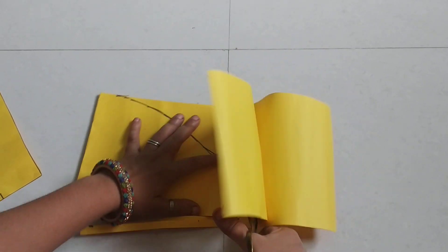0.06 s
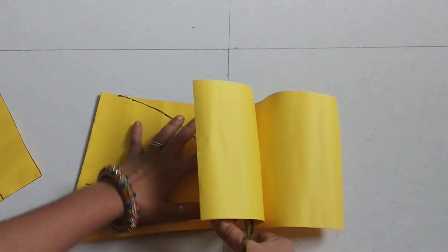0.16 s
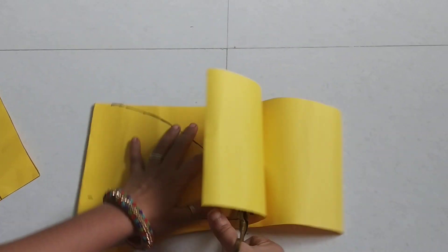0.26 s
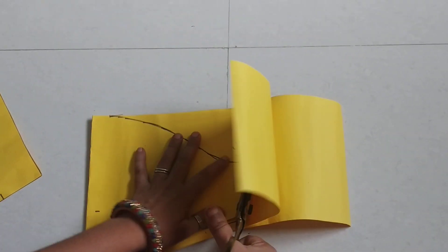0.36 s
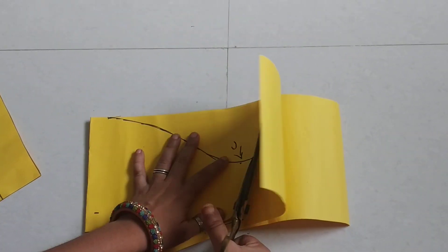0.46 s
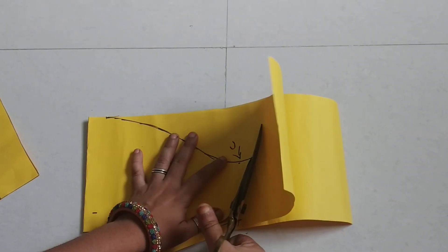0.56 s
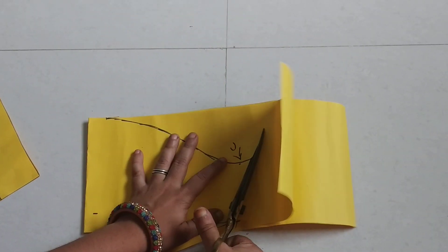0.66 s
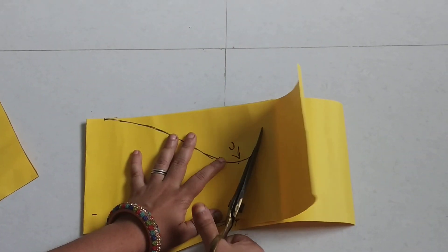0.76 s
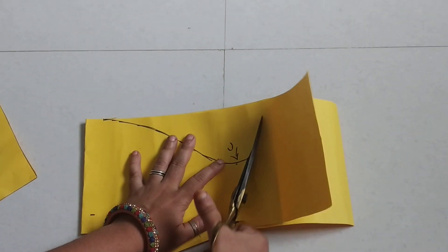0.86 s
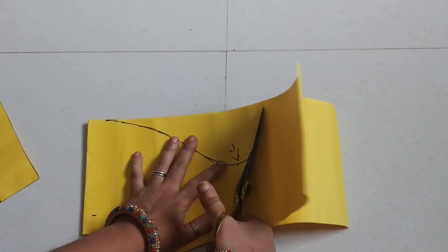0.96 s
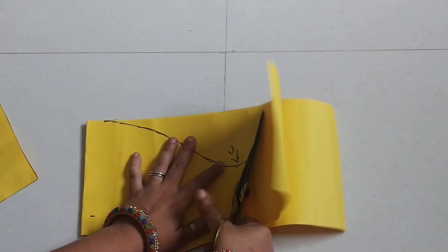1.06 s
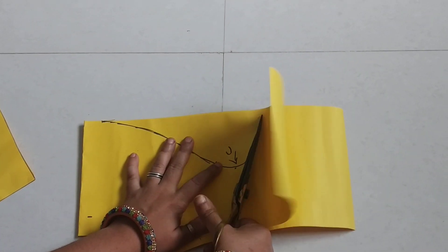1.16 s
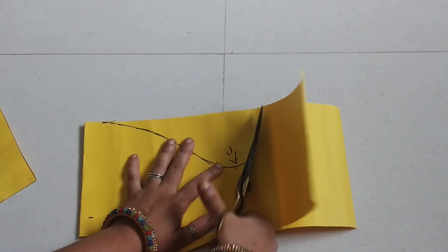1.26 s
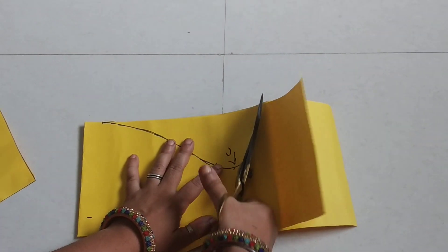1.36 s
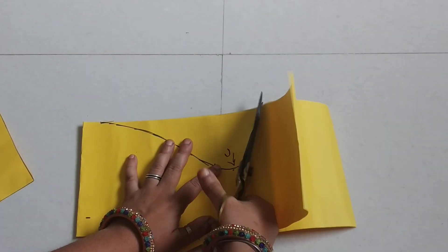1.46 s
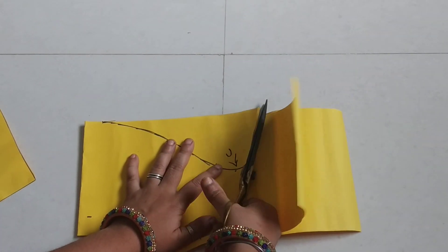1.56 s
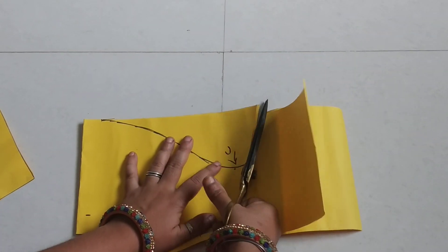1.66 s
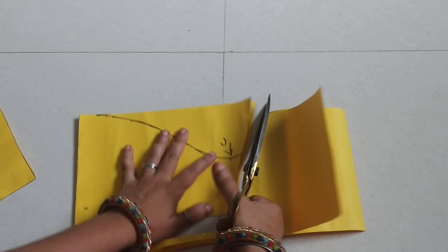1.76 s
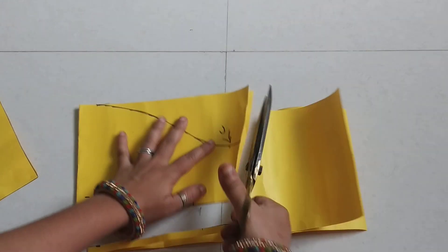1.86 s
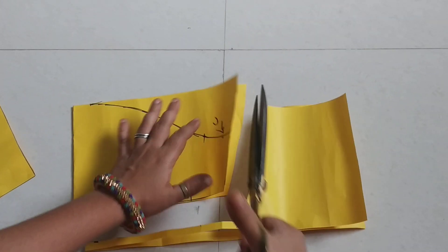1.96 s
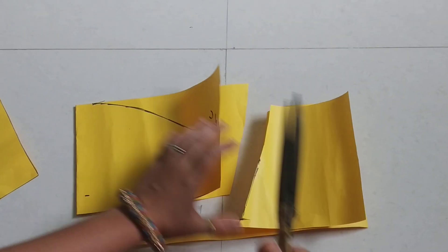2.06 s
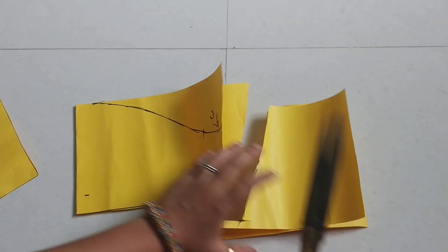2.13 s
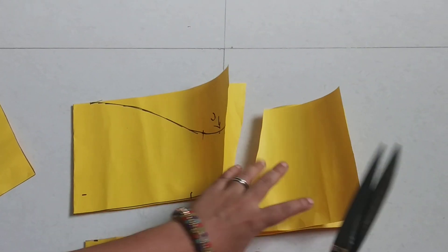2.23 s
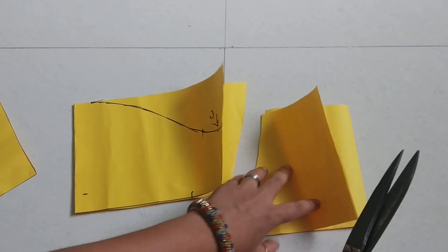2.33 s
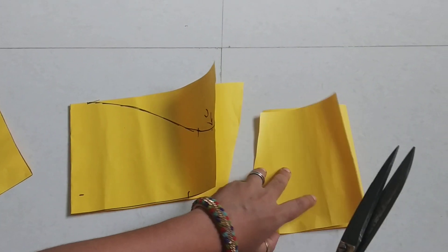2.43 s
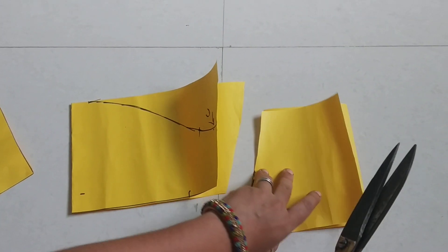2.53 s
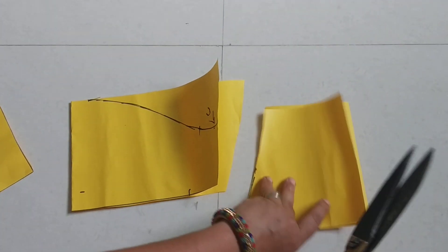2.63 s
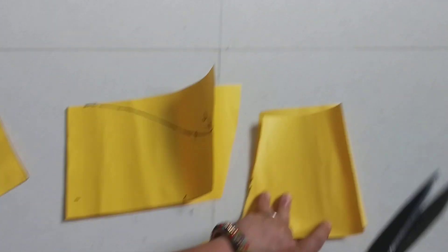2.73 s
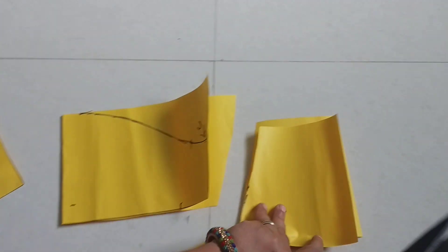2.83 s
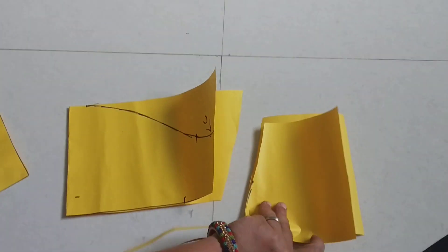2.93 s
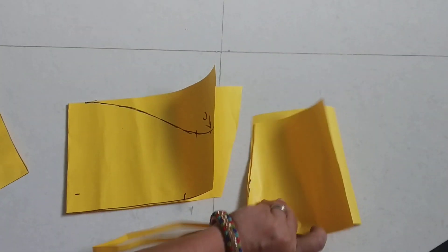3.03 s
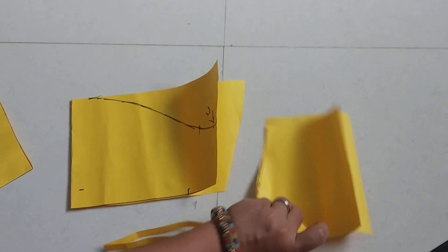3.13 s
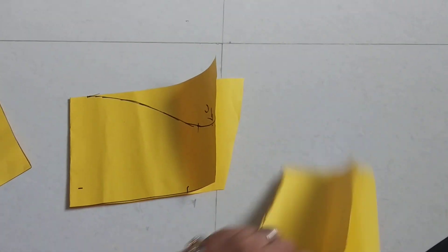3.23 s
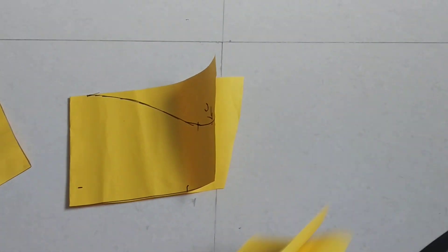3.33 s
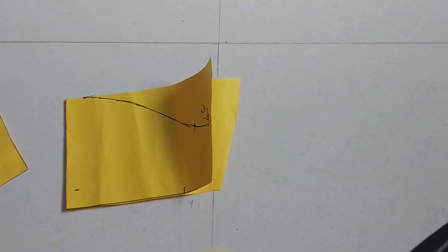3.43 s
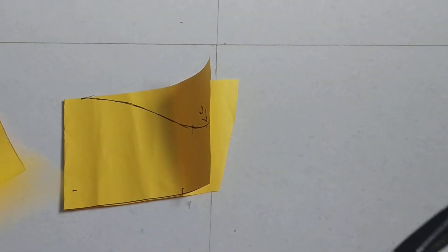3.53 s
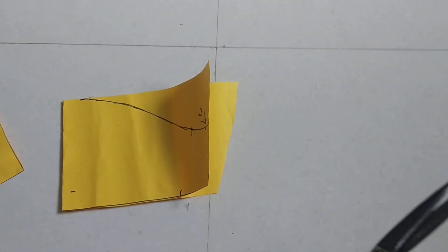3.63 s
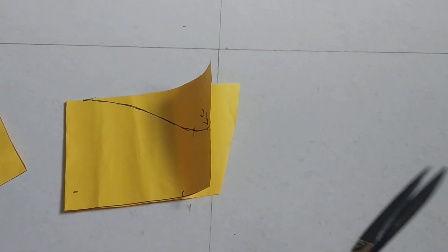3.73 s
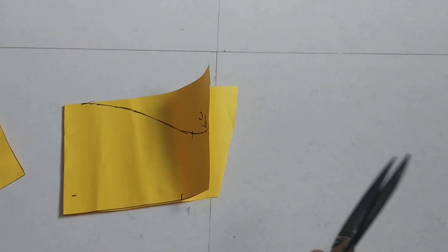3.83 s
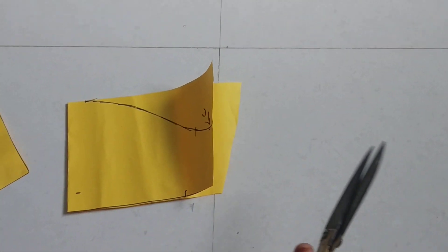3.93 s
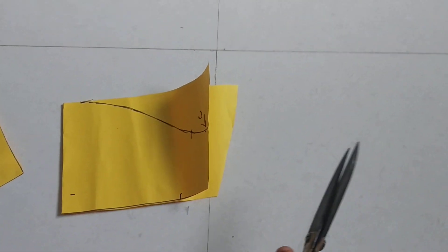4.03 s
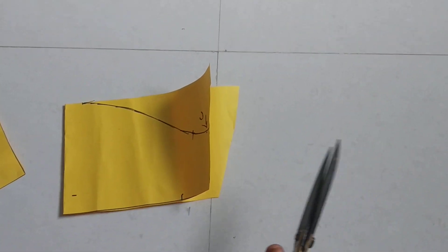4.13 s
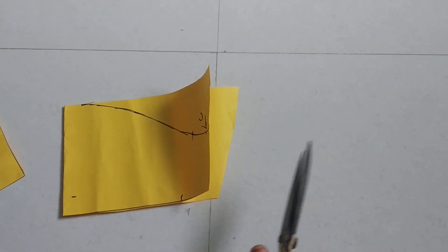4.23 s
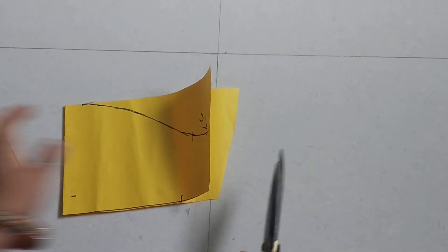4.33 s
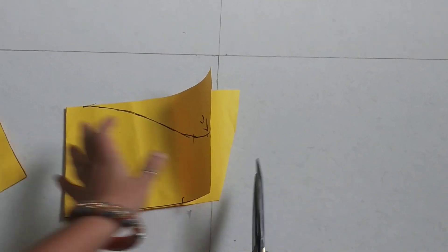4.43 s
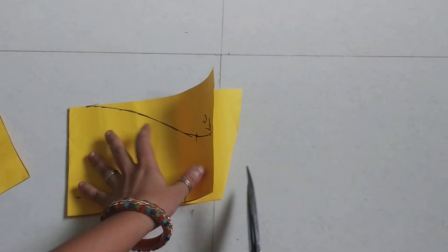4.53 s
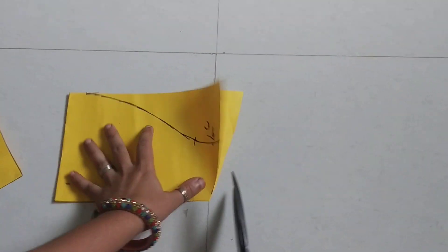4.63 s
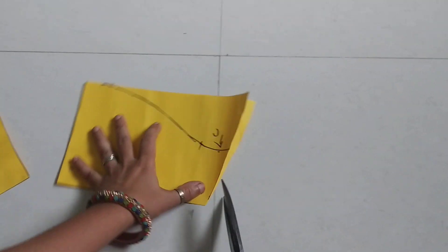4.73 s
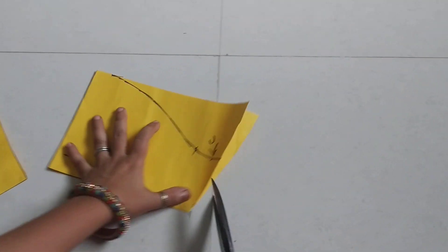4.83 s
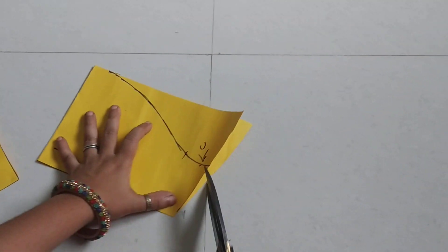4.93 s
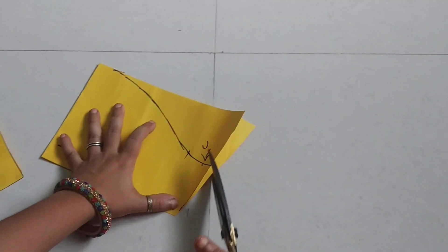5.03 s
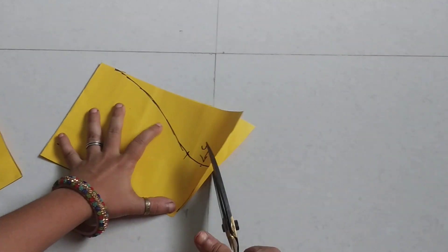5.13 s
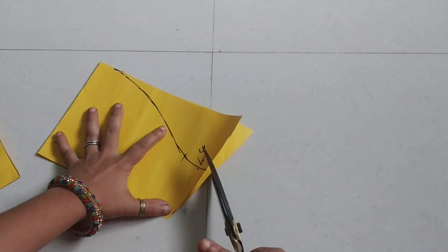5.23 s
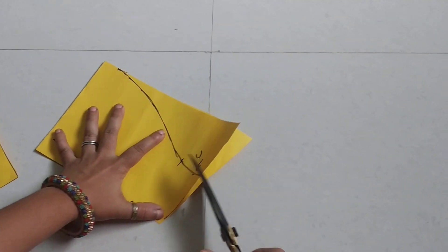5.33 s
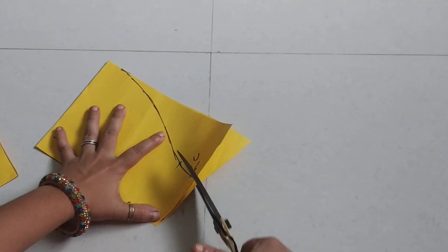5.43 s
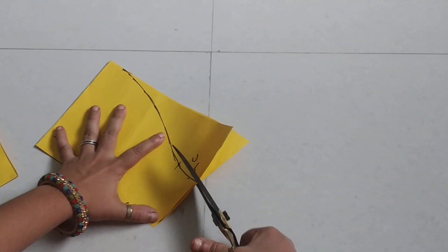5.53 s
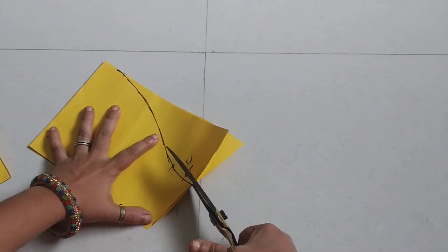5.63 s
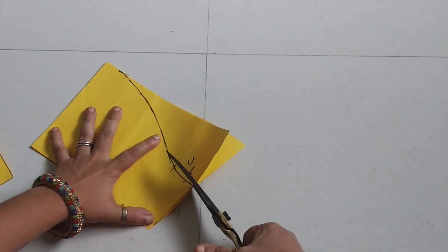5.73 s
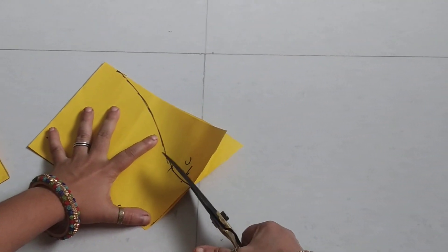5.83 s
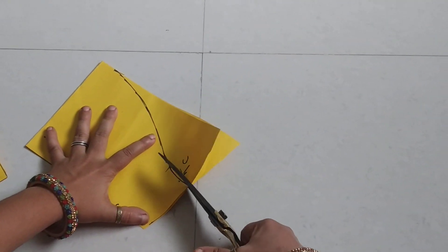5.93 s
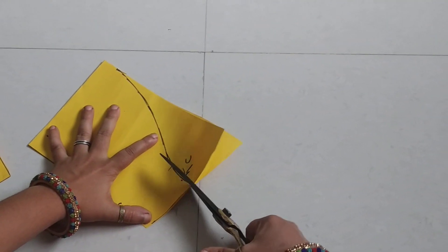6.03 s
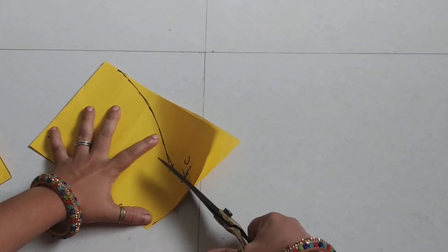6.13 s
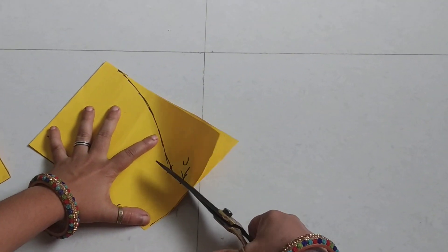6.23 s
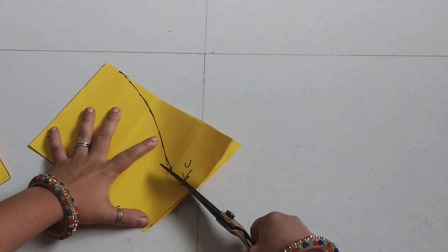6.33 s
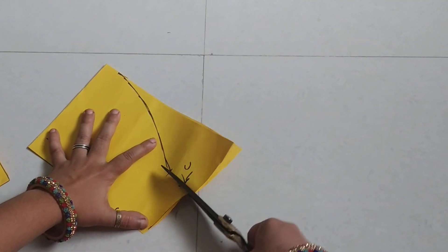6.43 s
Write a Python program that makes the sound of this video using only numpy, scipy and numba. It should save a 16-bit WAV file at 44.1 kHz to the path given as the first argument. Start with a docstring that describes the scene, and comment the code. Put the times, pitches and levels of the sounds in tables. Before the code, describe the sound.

Four sharp, tearing snips come in under two seconds, evenly spaced, each with papery snaps and a short bright room echo. A steel clack follows, then faint rustling and dull low rumble. Blades clack shut with a dull knock; dry, woody creaks of a gripped recorder run under a bangle's brief rattle. Paper scrapes hollowly on the floor before one soft final snip.

```python
"""Heavy steel scissors snip four times through folded paper on the tiled floor of a bare, echoing room.
The blades clack open, the offcut is pulled away, and the blades clack shut while the recorder creaks in the hand.
A bangle knocks and buzzes on the floor, the sheet drags over the tiles as it is turned, and a new cut begins.
Paper and sliding steel are made from random grains, hits from short noise bursts and decaying tones.
Low rumbles, steady room noise and a wavering hum lie underneath."""
import sys
import numpy as np
from scipy import signal
from scipy.fft import rfft, irfft
from scipy.io import wavfile
from numba import njit

SR = 44100
rng = np.random.default_rng(int(sys.argv[2]) if len(sys.argv) > 2 else 0)


def digitize_waveform(pressure):
    """Quantize a signal to 16-bit integers and store it at the path in sys.argv[1].

    Rows of a 2-D input are taken as channels; values are limited to [-1, 1].
    """
    field = np.atleast_2d(pressure).T
    bounded = np.clip(field, -1, 1)
    quanta = np.round(bounded * 32767).astype(np.int16)
    wavfile.write(sys.argv[1], SR, quanta)


N = 285768
TIME = np.arange(N) / SR   # seconds
CUTOFF_HZ = 16000          # nearly nothing is left above this pitch
CUT_EASE_DB = 6.5          # the bite is hardest at first and eases by this much towards the tips

# the blades bite and shear the paper, then reopen; levels are relative:
# (start_s, length_s, level_db, treble_db, ring_hz, reopening_level_db)
CUT_STROKES = [(0.127, 0.037, -29.5, 3, 2500, -77), (0.499, 0.057, -33.5, 6.5, 3180, -43),
               (0.9256, 0.0588, -26.5, 3, 3170, -42), (1.347, 0.08, -30, 6, 2420, -49.5),
               (6.421, 0.13, -45, 8, 2760, -48)]
# tone colour of cutting, snaps and knocks: (pitch_hz, relative_level_db per Hz)
SHEAR_COLOUR = [(100, -17.5), (300, -8.5), (700, -3), (1100, 1.5), (1600, 4.5), (3100, 1.5), (4500, -2.5),
                (5700, -4.5), (7200, -6.5), (10000, -8), (15500, -17.5)]


def cutting(clump_db=2.0, tear_db=-2.0):
    """The closing blades tear through fibres in uneven clumps, each bundle giving way with a tiny snap."""
    gain, treble_db = strokes(CUT_STROKES, rise_s=0.0084, fall_s=0.01, ease_db=CUT_EASE_DB)
    clumps = grains(per_s=5000, spread_db=2.4) * from_db(clump_db * drift(400))
    fibres = flexing(clumps, patchy_db=5.0, rate=220)
    torn = sheet_ring(brighten(gain * fibres, treble_db), CUT_STROKES, sag_octaves_per_s=7.6,
                      wander_octaves=0.17, q=6.6, ring_db=-5.0)
    return through(from_db(tear_db) * torn + splinters(), colour(SHEAR_COLOUR))


def splinters(per_s=210, size_db=11, spread_db=2.5, pitch_octaves=0.53, decay_s=0.001, count=48):
    """Thicker fibre bundles break one by one along each cut, each a short ping near the sheet's pitch."""
    rows = []
    for s, length, db, treble_db, ring_hz, reopening_db in CUT_STROKES:
        waits = rng.uniform(.2, 1.8, count)   # uneven gaps, 1 on average
        sizes, pitches = np.clip(rng.standard_normal((2, count)), -2, 2)
        for age, size, pitch in zip(np.cumsum(waits) / per_s, sizes, pitches):
            if age < length and s + age < TIME[-1]:
                level_db = db + size_db + spread_db * size - CUT_EASE_DB * age / length
                ping_hz = min(ring_hz * 2 ** (pitch_octaves * pitch), CUTOFF_HZ)
                rows.append((s + age, level_db, treble_db, ping_hz, decay_s))
    return cracks(rows, ring_db=8.0, ring_q=7.6)


def snaps_and_knocks(apart_db=-11):
    """Each snap or knock cracks and rings; it reaches the two ears slightly differently."""
    # the folded sheet snaps and buckles, and the closing blades knock dully near 3.97 s:
    # (start_s, relative_strength_db, treble_db, ring_hz, decay_s)
    hits = [(.1355, -12.5, -19, 2720, 0.00035), (.1455, -11.5, -21, 1050, 0.0024),
            (.1472, -5, -9, 2420, 0.00036), (.156, -22, -3, 900, 0.00091), (.455, -20, -20, 1360, 0.014),
            (.4995, -14.5, -2, 3320, 0.00078), (.503, -9, -7, 3250, 0.0056),
            (.5075, -11.5, 3.5, 3340, 0.0021), (.512, -13, 0, 3800, 0.001), (.565, -19, 5, 1230, 0.0031),
            (.843, -24.5, -14, 1290, 0.0056), (.9415, -17, -2, 3020, 0.00071),
            (.9958, -11.5, -1, 2570, 0.0053), (.9962, -11, -12, 1250, 0.0014),
            (1.3275, -14, -8, 1400, 0.0018), (1.335, -24, 11, 1600, 0.0012),
            (1.3565, -23, -12, 1500, 0.0028), (1.3675, -14, -10, 1700, 0.0045),
            (1.3965, -11, -2, 3800, 0.0035), (1.4045, -21.5, 15.5, 1621, 0.0025),
            (1.4125, -20, -10, 1600, 0.0018), (1.632, -28.5, 3, 1900, 0.013), (1.971, -35, 2, 2530, 0.0053),
            (1.991, -37, 11, 2780, 0.005), (2.158, -28.5, -13, 2190, 0.0025),
            (2.189, -27.5, 7, 2700, 0.0047), (2.928, -29.5, -4, 1740, .003),
            (2.9975, -27.5, 2, 1970, 0.0055), (3.054, -29.5, -24, 1380, 0.0021),
            (3.066, -28.5, -22, 1350, 0.0016), (3.106, -38.5, 12, 4900, 0.0034),
            (3.538, -28.5, 1, 900, 0.0016), (3.5635, -32.5, 2, 1680, .003), (3.926, -28, 1, 1930, 0.0013),
            (3.971, -19, -14, 1410, 0.0075), (3.98, -15, -12, 1220, 0.0046), (4.8345, -29, -4, 2880, .002),
            (4.848, -32, 12.5, 5970, 0.0058), (5.316, -28, -7, 2440, 0.0026),
            (5.325, -22.5, -4, 2360, 0.0021)]
    mid, side = (cracks(hits) for _ in range(2))
    stereo = mid + from_db(apart_db) * side * [[1], [-1]]
    return from_db(3.5) * through(stereo, colour(SHEAR_COLOUR))


def gliding(judder_db=1.0):
    """Steel edges rub with a fine, uneven grain as the blades swing in the air."""
    # blades sliding on each other: (start_s, length_s, level_db, treble_db)
    glides = [(2.42, 0.063, -75, 22), (3.81, 0.14, -55, 2), (3.93, .022, -41, -18),
              (3.953, 0.074, -33.5, -5), (4.25, 0.3, -56.5, 2.5), (4.95, 0.18, -64.5, 4),
              (5.16, 0.29, -56.5, 0.5), (6.37, 0.068, -54.5, 2.5)]
    # tone colour of the rub: (pitch_hz, relative_level_db per Hz)
    rub_colour = [(200, -10.5), (700, -3), (1400, 1.5), (2000, 2.5), (2900, 2.5), (4000, -0.5), (5700, -3),
                  (7100, -0.5), (8500, -1.5), (11000, -2.5), (15500, -12)]
    # the hand pauses after a cut, then swings the blades apart
    pause_s, reopen_s, reopen_treble_db = 0.12, 0.17, -3.5
    reopenings = [(s + length + pause_s, reopen_s, db, reopen_treble_db)
                  for s, length, *bite, db in CUT_STROKES]
    gain, treble_db = strokes(glides + reopenings, rise_s=0.01, fall_s=0.015, ease_db=1.0)
    juddering = grains(per_s=9000, spread_db=1.0) * from_db(judder_db * drift(80))
    rub = flexing(juddering, patchy_db=3.0, rate=110)
    return through(brighten(gain * rub, treble_db), colour(rub_colour))


def clacking(chatter_s=0.0013):
    """Steel chatters on steel; the hand damps the ring at once, and each mode radiates its own way."""
    # the blades hit their stop: (start_s, relative_level_db, treble_db, left_minus_right_db, left_ear_lag_s)
    clacks = [(2.4922, -31, 8, -3, 0), (2.4934, -4, 4.5, -4, 0.0011), (3.9542, -12, -5, -4, .00045),
              (3.957, -1.5, -6.5, -6, 0.0024), (6.421, -27, 4.5, -1, 0.011), (6.4565, -19.5, 2.5, -6, 0.01)]
    # ringing tones of the blades: (pitch_hz, width_hz, relative_level_db, left_minus_right_db)
    steel_modes = [(1820, 640, -3, 3.5), (2700, 840, -1.5, 1.5), (4280, 660, -0.5, -3), (6560, 760, 3, 2),
                   (9150, 2500, -2.5, 2.5), (11100, 1600, -1.5, 1), (13700, 3000, -6, 10.5)]
    clicks = cracks([(s, db, treble_db, None, chatter_s) for s, db, treble_db, *place in clacks])
    ears = []
    for side in (.5, -.5):   # left, then right
        heard = clicks * from_db(side * held(clacks, axis=3))
        modes = [(hz, width, db + side * pan) for hz, width, db, pan in steel_modes]
        ears.append(through(heard, body(modes))[0])
    left, right = ears
    return np.array([np.interp(TIME - held(clacks, axis=4), TIME, left), right])


def rustling(clump_db=2.0):
    """Moving paper crackles in clumps; pressed flat, it drags with a smooth, hollow scrape."""
    # paper lifted, pulled and turned: (start_s, length_s, relative_level_db, treble_db, ring_hz, rise_s)
    rustles = [(0, 0.11, -54, 6.5, 2240, 0.00063), (0.298, 0.28, -52.5, -29, 1800, .01),
               (0.444, 0.034, -46, -5.5, 1480, .004), (1.324, 0.032, -40, 6, 1600, 0.0029),
               (1.974, 0.16, -61, 6.5, 2700, 0.0026), (2.143, 0.063, -54.5, 6.5, 2700, 0.0067),
               (2.643, 0.17, -55, 6.5, 2580, 0.018), (2.862, 0.2, -54, 8, 2500, 0.051),
               (3.035, 0.092, -54.5, 2, 1240, 0.021), (3.21, 0.23, -63.5, 0, 2840, 0.044),
               (3.539, 0.052, -52, 6.5, 1210, .008), (4.829, 0.078, -48, 5.5, 2760, 0.005),
               (5.306, 0.033, -50.5, 10, 2600, 0.0056), (6.144, 0.023, -50.5, 5, 2200, 0.003),
               (6.174, 0.037, -51, 5.5, 1380, 0.0067), (6.216, 0.061, -49, 2.5, 2400, 0.005)]
    # the sheet drags over the tiles: (time_s, relative_level_db)
    drag_levels = [(5.38, -47.5), (5.5, -56), (5.62, -46), (5.72, -53), (5.88, -63), (6.05, -58.5)]
    # tone colours of loose paper and of the drag: (pitch_hz, relative_level_db per Hz)
    paper_colour = [(150, -1.5), (400, 9), (850, 6), (1500, 4), (2000, 1.5), (2600, 5), (4000, 0.5),
                    (6000, -2.5), (9500, -3.5), (15500, -9)]
    scrape_colour = [(350, -0.5), (700, -8), (1400, -13), (1850, 7), (2080, -1), (2440, 7.5), (2750, -6),
                     (4300, -15), (15000, -36)]
    # each move of the sheet slackens by 6 dB
    gain = sum(from_db(db) * envelope(s, length, rise_s, fall_s=0.043, ease_db=6)
               for s, length, db, treble_db, ring_hz, rise_s in rustles)
    clumps = grains(per_s=2600, spread_db=1.0) * from_db(clump_db * drift(120))
    crackle = flexing(clumps, patchy_db=4.5, rate=110)
    rustle = sheet_ring(brighten(gain * crackle, held(rustles, axis=3)), rustles, sag_octaves_per_s=3.4,
                        wander_octaves=0.2, q=1.66, ring_db=-0.5)
    s, level_db = np.transpose(drag_levels)
    drag_gain = np.interp(TIME, s, from_db(level_db), left=0, right=0)
    drag = drag_gain * grains(per_s=7500, spread_db=1.5)
    return (from_db(-1.0) * through(rustle, colour(paper_colour))
            + from_db(-8.0) * through(drag, colour(scrape_colour)))


def bangle():
    """The bangle knocks on the floor as the hand lands, then buzzes on while the hand turns the sheet."""
    # knocks through the paper: (start_s, relative_peak_db)
    knocks = [(4.6412, -25), (4.6445, -29)]
    # ringing tones of the bangle: (pitch_hz, width_hz, relative_level_db)
    bangle_modes = [(690, 600, -3.5), (1190, 94, 3.5), (1510, 190, -2), (2240, 100, 3.5), (2580, 160, 1.5),
                    (7540, 5700, -17)]
    rattle = slips(knocks[-1][0], length=.18, per_s=130, db=-37, ease_db=11)   # on the whole ever softer
    return contacts(knocks + rattle, bangle_modes, detune=0.038, vary_db=3.0)


def grip(groan_hz=368, groan_wander=1.0):
    """Sticking and slipping on the recorder's case reach the microphones directly, without echo."""
    # the grip slips on the case: (start_s, peak_db)
    creak_hits = [(3.865, -36.5), (4.106, -37), (4.168, -36), (4.263, -36.5), (4.321, -37), (4.424, -36),
                  (4.521, -35.5), (4.643, -34), (4.68, -33), (4.724, -33), (4.767, -34.5), (4.819, -35),
                  (4.905, -34.5)]
    # a finger drags on the case and keeps its lowest tone groaning: (start_s, length_s, level_db)
    groans = [(3.753, 0.027, -37.5), (3.796, 0.05, -39.5)]
    # ringing tones of the case: (pitch_hz, width_hz, relative_level_db)
    case_modes = [(344, 41, 7), (646, 88, -3), (1050, 410, -22), (2420, 190, -12)]
    creaks = contacts(creak_hits, case_modes, detune=0.027, vary_db=3.0)
    # around the creaks the grip creeps on in tiny slips, slightly stronger with time
    creep_hits = slips(3.85, length=1.2, per_s=38, db=-48, ease_db=-1)
    creeping = contacts(creep_hits, case_modes, detune=0.093, vary_db=1.0)
    pressure = sum(from_db(db) * envelope(s, length, rise_s=0.0083, fall_s=0.0083, ease_db=7.0)
                   for s, length, db in groans)
    tone = np.sin(2 * np.pi * groan_hz * TIME + groan_wander * drift(83))
    return creaks + creeping + pressure * from_db(3.3 * drift(150)) * tone


def rumbling(width_octaves=0.58, sink_octaves_per_s=2.5):
    """Dull, low noise whose centre slides down through a row of bands."""
    # rumbles that sink in pitch: (start_s, length_s, first_centre_hz, level_db)
    rumbles = [(0, 0.087, 900, -47), (0.134, 0.056, 770, -32), (0.145, 0.28, 228, -49),
               (0.948, 0.13, 480, -47.5), (1.41, 0.21, 343.3, -42.5), (2.16, 0.042, 199, -53),
               (2.534, 0.58, 180, -47.5), (2.878, 0.09, 67.6, -51), (3.965, 0.042, 577, -38),
               (6.215, 0.08, 430, -50)]
    gains = [from_db(db) * envelope(s, length, rise_s=0.014, fall_s=0.06, ease_db=13)
             for s, length, hz, db in rumbles]
    centres = [np.log2(hz) - sink_octaves_per_s * (TIME - s) for s, length, hz, db in rumbles]
    out = 0
    for band_hz in 45 * 2 ** np.arange(0, 5, .5):   # half an octave apart
        edges_hz = [band_hz / 2 ** .25, band_hz * 2 ** .25]
        sos = signal.butter(2, edges_hz, "band", fs=SR, output="sos")
        share = 0
        for gain, centre in zip(gains, centres):
            distance = (np.log2(band_hz) - centre) / width_octaves
            share = share + gain * np.exp(-.5 * np.minimum(distance ** 2, 20))
        out = out + share * rms_one(signal.sosfilt(sos, rng.standard_normal(N)))
    return out / np.sqrt(2 * np.sqrt(np.pi) * width_octaves)   # keeps the bands' summed power level


def background(air_db=-54, waver_db=4.0, wander=1.8):
    """Steady room noise lies under low hum tones that waver in strength and phase."""
    # tone colour of the room noise: (pitch_hz, relative_level_db per Hz)
    air_colour = [(12, -11), (22, 2), (45, -5), (80, -7.5), (150, -11), (350, -8.5), (600, -15.5),
                  (1100, -22.5), (3000, -23.5), (5000, -28.5), (9000, -27.5), (16000, -31)]
    # hum tones before wavering and swelling: (pitch_hz, relative_level_db)
    hum_tones = [(58, -65.5), (125, -72.5)]
    # the hum swells and fades: (time_s, gain_db)
    hum_swell = [(0, 3.5), (1.1, 0.5), (1.75, 1.5), (3.3, 8.5), (4.3, 1), (5.3, -0.5), (6.48, -5)]
    hum = 0
    for hz, db in hum_tones:
        tone = np.sin(2 * np.pi * hz * TIME + wander * drift(7.2))
        hum = hum + from_db(db + waver_db * drift(4.01)) * tone
    swell = from_db(np.interp(TIME, *np.transpose(hum_swell)))
    return from_db(air_db) * through(diffuse(N), colour(air_colour)) + np.sqrt(2) * swell * hum


def room(x, gap_s=0.00029, build_s=0.0082, ceiling_s=0.019, ceiling_db=-20, size=32768):
    """Hard walls answer with a dense tail whose bass lasts longest; the ceiling adds one distinct echo."""
    # time the echo takes to fall by 60 dB: (pitch_hz, decay_s)
    decay_times = [(200, 1), (800, 0.51), (2000, 0.53), (10000, 0.5)]
    t, noise, tail = np.arange(size) / SR, rfft(diffuse(size)), 0
    hz = np.arange(noise.shape[1]) * SR / size
    band = np.round(np.log2(np.maximum(hz, 125) / 125))   # octaves above 125 Hz
    for k in np.unique(band):
        t60 = at_hz(decay_times, 125 * 2 ** k)
        tail = tail + irfft(noise * (band == k), size) * from_db(-60 * t / t60)
    tail = tail * np.clip((t - gap_s) / build_s, 0, 1)
    echo = from_db(ceiling_db) * signal.unit_impulse(size, round(ceiling_s * SR))
    return through(x, rms_one(tail) / np.sqrt(size) + echo)


def diffuse(size):
    """Noise from all directions: the ears hear it most alike in a low band, unalike well above and below."""
    # how alike left and right are: (pitch_hz, likeness from 0 to 1)
    likeness = [(60, 0), (250, 0.87), (600, 0)]
    mid, side = rfft(rng.standard_normal((2, size)))
    alike = np.clip(at_hz(likeness, np.arange(len(mid)) * SR / size), -1, 1)
    return irfft(np.sqrt((1 + alike) / 2) * mid + np.sqrt((1 - alike) / 2) * side * [[1], [-1]], size)


def grains(per_s, spread_db, lag_spread=3.3):
    """Tiny random ticks of many sizes, each at its own spot and so with its own lag (samples) between ears."""
    sizes = from_db(spread_db * np.minimum(rng.exponential(1, N), 4)) * rng.choice([-1, 1], N)
    left = sizes * (rng.random(N) < per_s / SR)
    lag = np.round(lag_spread * rng.standard_normal(N))
    arrival = np.clip(np.arange(N) + lag, 0, N - 1).astype(int)
    return rms_one(np.array([left, np.bincount(arrival, left, N)]))


def flexing(x, patchy_db, rate, count=16):
    """As surfaces bend or rub, each band of pitches comes and goes on its own; unit power."""
    spectrum = rfft(x)
    hz = np.arange(spectrum.shape[1]) * SR / N
    place = np.sqrt(np.minimum(hz / CUTOFF_HZ, 1)) * (count - 1)   # position along the row of bands
    out = 0
    for k in range(count):
        band = irfft(spectrum * np.maximum(1 - np.abs(place - k), 0), N)
        out = out + band * from_db(patchy_db * drift(rate))
    return rms_one(out)


def sheet_ring(x, rows, sag_octaves_per_s, wander_octaves, q, ring_db):
    """The free sheet rings at each row's ring_hz, which wanders and sinks as more paper comes loose."""
    age = np.clip(TIME - held(rows, axis=0), 0, .2)   # the sinking stops after 0.2 s
    octaves = wander_octaves * drift(70) - sag_octaves_per_s * age
    centre_hz = held(rows, axis=4) * 2 ** octaves
    return x + from_db(ring_db) * resonate(x, np.clip(centre_hz, 200, 6000), max(q, 1))


@njit
def resonate(x, centre_hz, q):
    """Band-pass with a moving centre, gain 1 on top."""
    out = np.zeros_like(x)
    for ear in range(2):
        low, band = 0., 0.
        for i in range(x.shape[1]):
            step = 2 * np.sin(np.pi * centre_hz[i] / SR)
            low += step * band
            band += step * (x[ear, i] + 1e-18 - low - band / q)
            out[ear, i] = band / q
    return out


def cracks(rows, ring_db=6.0, ring_q=6.4):
    out = np.zeros(N)
    for s, db, treble_db, ring_hz, decay_s in rows:
        burst = from_db(db) * crack(decay_s)
        if ring_hz:
            ring = signal.lfilter(*signal.iirpeak(ring_hz, ring_q, fs=SR), burst)
            burst = burst + from_db(ring_db) * ring
        at = round(s * SR)
        out[at:at + len(burst)] += brighten(burst, treble_db)[:N - at]
    return out


def crack(decay_s, size=2048):
    """A dense noise burst that dies at once, evened out in colour; unit energy."""
    fade = np.exp(-np.arange(size) / SR / decay_s)
    burst = rng.standard_normal(size) * fade
    for _ in range(2):
        spectrum = rfft(burst)
        burst = irfft(spectrum / (np.abs(spectrum) + 1e-9)) * np.sqrt(fade)
    return burst / np.linalg.norm(burst)


def slips(s, length, per_s, db, ease_db, jitter_s=0.007, spread_db=1.5):
    """Stick and slip: an uneven run of contacts that eases by ease_db, as rows (start_s, peak_db)."""
    due = np.arange(s, s + length, 1 / per_s)
    late, strength = rng.standard_normal((len(due), 2)).T
    peak_db = db - ease_db * (due - s) / length + spread_db * strength
    return list(zip(due + jitter_s * np.abs(late), peak_db))


def contacts(rows, modes, detune, vary_db, size=2048):
    """Each contact (start_s, peak_db) finds the object loaded anew, so its modes shift in pitch and strength."""
    out = np.zeros(N)
    for s, db in rows:
        loaded = [(hz * (1 + detune * rng.standard_normal()), width,
                   level_db + vary_db * rng.standard_normal()) for hz, width, level_db in modes]
        at = round(s * SR)
        out[at:at + size] += from_db(db) * body(loaded, size)
    return out


def body(modes, size=4096):
    """Ring of a struck object: fading tones, where a wider mode dies faster; peak 1."""
    t = np.arange(size) / SR
    ring = 0
    for k, (hz, width, db) in enumerate(modes):
        fading = width * np.exp(-np.pi * width * t)
        ring = ring + (-1) ** k * from_db(db) * fading * np.sin(2 * np.pi * hz * t)
    return ring / np.abs(ring).max()


def strokes(rows, rise_s, fall_s, ease_db):
    """Gain and treble of strokes (start_s, length_s, level_db, treble_db) that share one envelope shape."""
    gain = sum(from_db(db) * envelope(s, length, rise_s, fall_s, ease_db) for s, length, db, *rest in rows)
    return gain, held(sorted(rows), axis=3)


def envelope(s, length, rise_s, fall_s, ease_db):
    """One stroke: it swells in, eases off while it lasts and then dies away."""
    age = TIME - s
    rise = np.clip(age / rise_s, 0, 1)
    ease = from_db(-ease_db * np.clip(age / length, 0, 1))
    return rise * ease * np.exp(-np.clip((age - length) / fall_s, 0, 20))


def held(rows, axis):
    """A column of an event table, held from just before each event to the next."""
    rows = np.array(rows)
    latest = np.searchsorted(rows[:, 0], TIME + .001) - 1
    return rows[np.maximum(latest, 0), axis]


def brighten(x, treble_db, split_hz=4200):
    """Sharper contacts put more into the treble; each filter runs twice for a steeper split."""
    low, high = (np.tile(signal.butter(2, split_hz, kind, fs=SR, output="sos"), (2, 1))
                 for kind in ("low", "high"))
    return signal.sosfilt(low, x + 1e-18) + signal.sosfilt(high, x * from_db(treble_db) + 1e-18)


def colour(spectrum, size=4096):
    """Unit-energy impulse response with the given spectrum, sounding only after its input (minimum phase)."""
    hz = np.arange(size // 2 + 1) * SR / size
    cepstrum = irfft(np.log(from_db(at_hz(spectrum, hz))))
    cepstrum[1:size // 2] *= 2
    cepstrum[size // 2 + 1:] = 0
    response = irfft(np.exp(rfft(cepstrum)))
    return response / np.linalg.norm(response)


def through(x, response):
    """Pass a signal through an impulse response."""
    return signal.oaconvolve(np.atleast_2d(x), np.atleast_2d(response), axes=-1)[:, :N]


def drift(rate):
    """Slow chance with spread 1: straight lines between random points, rate points per second."""
    knots = rng.standard_normal(4000)
    return rms_one(np.interp(TIME * rate, np.arange(len(knots)), knots))


def at_hz(points, hz):
    """Read a table on a log-frequency axis."""
    points = np.array(points)
    return np.interp(np.log(np.maximum(hz, 1)), np.log(points[:, 0]), points[:, 1])


def rms_one(x):
    """Scale to unit power."""
    return x / np.sqrt(np.mean(x ** 2) + 1e-20)


def from_db(db):
    """Decibels to gain."""
    return 10 ** (np.asarray(db) / 20)


def scene():
    """Paper, steel and bangle sound in the room; the grip, rumbles and background are added dry."""
    paper = cutting() + gliding() + rustling()
    taps = snaps_and_knocks() + bangle()
    steel = clacking()
    # the room hears the steel's right side, a little less of it in the right echo
    sent = paper + from_db(1.5) * taps + from_db(1.0) * steel[1] * from_db([[-1.0], [-1.5]])
    return paper + taps + steel + room(sent) + grip() + rumbling() + background()


def record(dry):
    """The top is cut steeply."""
    return signal.sosfilt(signal.ellip(10, .2, 70, CUTOFF_HZ, fs=SR, output="sos"), dry)


dry = scene()
out = record(dry)
digitize_waveform(out)
```